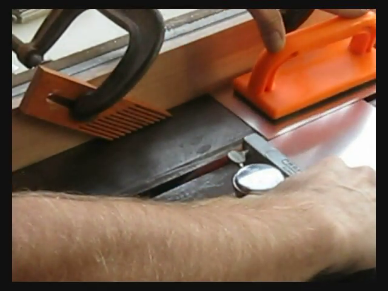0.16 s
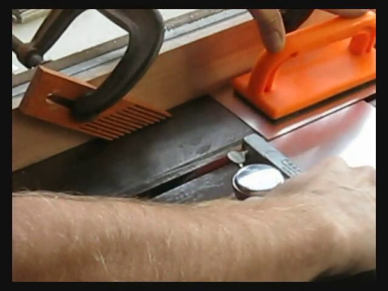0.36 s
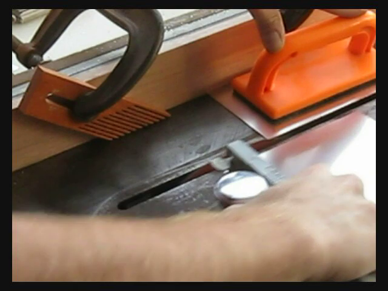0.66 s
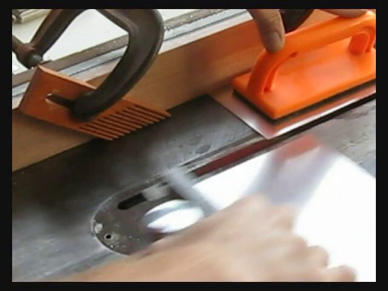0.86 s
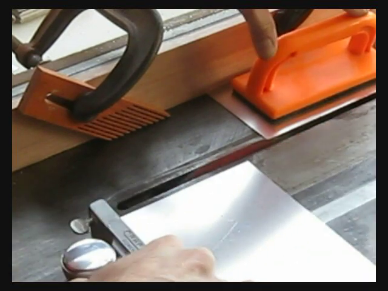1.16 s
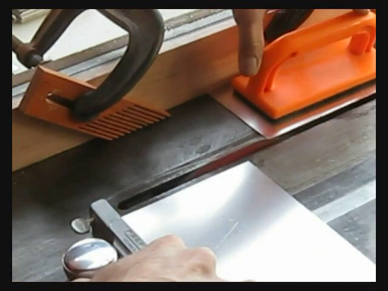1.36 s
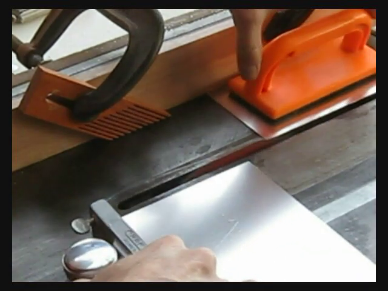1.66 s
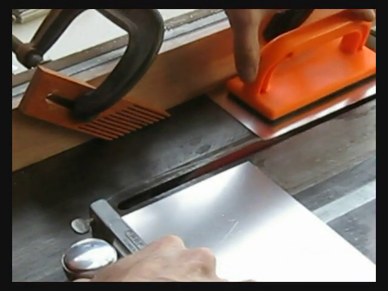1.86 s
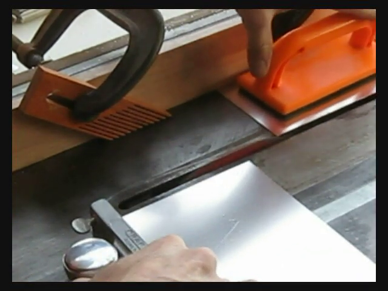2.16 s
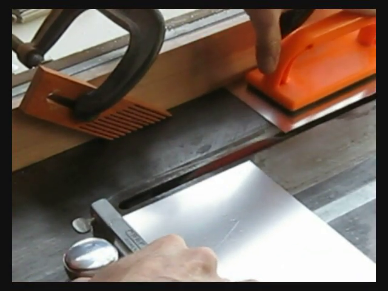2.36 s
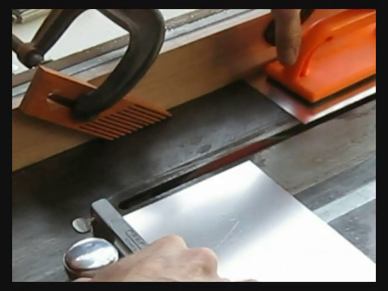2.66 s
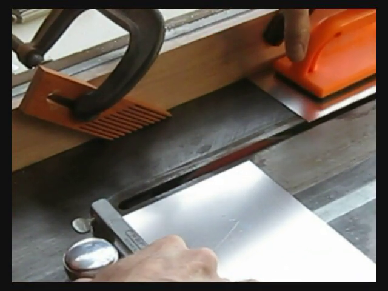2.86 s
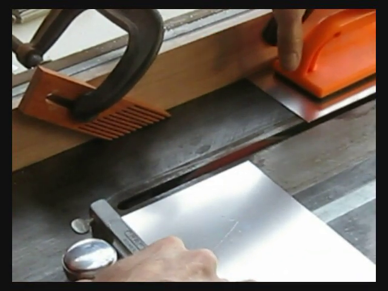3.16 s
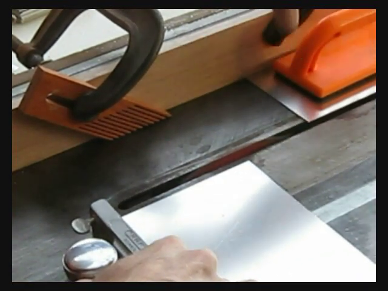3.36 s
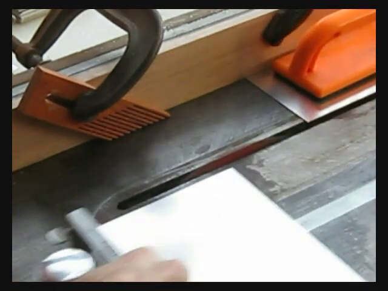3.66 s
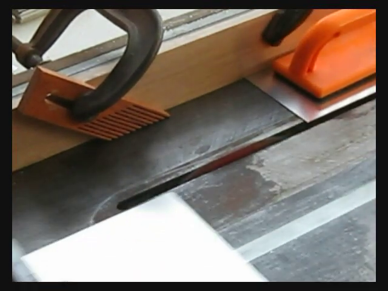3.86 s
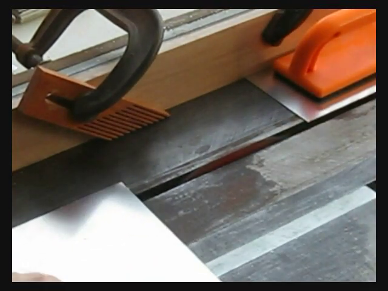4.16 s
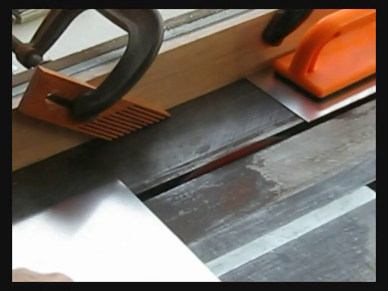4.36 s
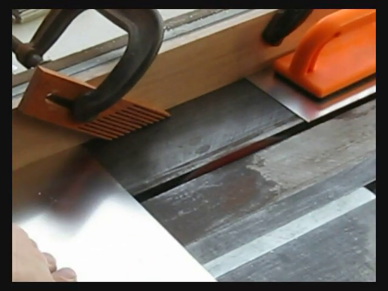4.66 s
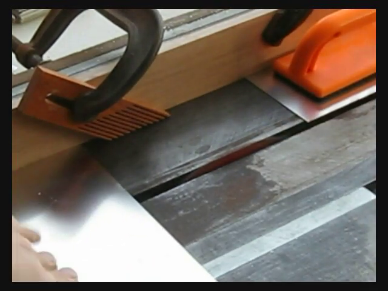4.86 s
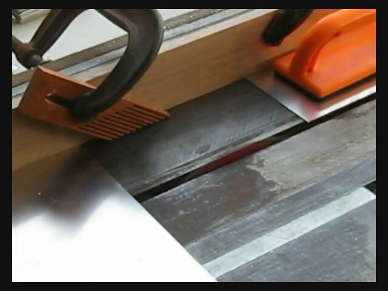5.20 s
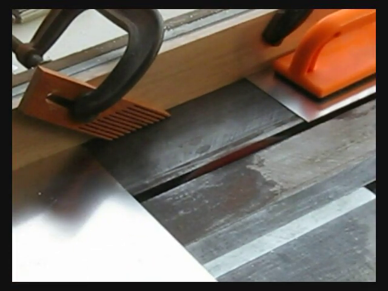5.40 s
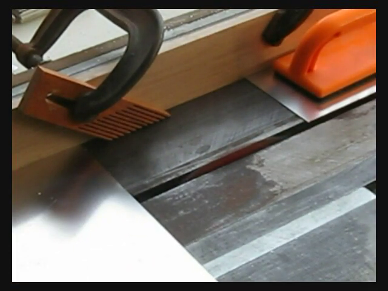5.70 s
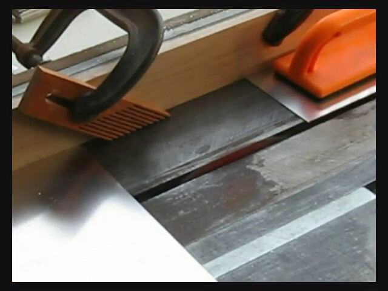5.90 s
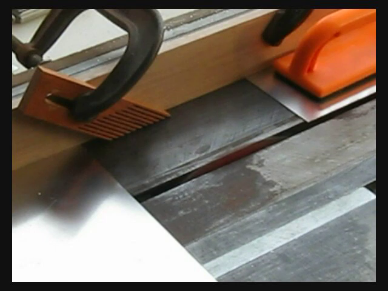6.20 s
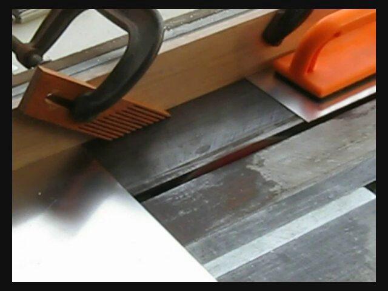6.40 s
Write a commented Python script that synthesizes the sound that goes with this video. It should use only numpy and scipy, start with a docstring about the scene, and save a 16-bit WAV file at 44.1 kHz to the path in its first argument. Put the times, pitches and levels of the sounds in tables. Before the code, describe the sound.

Steady, harsh saw noise heard very close through a small camera microphone with dull highs: coarse rasp, rattling cabinet, low hum and ringing blade. Metal sliding scrapes come early, then a short dip exposes a wavering squeal. The full noise returns, the sheet slides again and strikes the fence with one loud, dry clack, briefly pushing down the level before the saw continues.

```python
"""A table saw runs in a workshop while a thin aluminium sheet is moved along it, close to a small camera.
The motor hums (two sines), the drive rattles the cabinet and worn teeth rasp (coloured noise and
impacts); table and blade ring as noise-driven resonances. The sound dips while the sheet squeals
briefly on wavering sines; scrapes are dense impacts. Later the sheet knocks on the fence (decaying
modes and a short room tail) and the camera's gain control ducks and recovers."""
import sys
import numpy as np
from scipy import signal
from scipy.fft import rfft, irfft
from scipy.io import wavfile
from scipy.ndimage import uniform_filter1d

SR = 44100
rng = np.random.default_rng(int(sys.argv[2]) if len(sys.argv) > 2 else 0)


def unload_audio(sound):
    """Save the sound as a 16-bit wav file, at the path given as the first command line argument."""
    columns = np.transpose(np.atleast_2d(sound))
    # keep every value between -1 and 1, then stretch to whole-number steps
    steps = np.round(np.clip(columns, -1, 1) * 32767)
    wavfile.write(sys.argv[1], SR, steps.astype(np.int16))


N = 288395
T = np.arange(N) / SR  # s


def undb(db):
    """Amplitude factor of a level in dB."""
    return 10 ** (np.asarray(db) / 20)


def unit(x):
    """Scale to rms 1."""
    return x / np.sqrt(np.mean(x ** 2))


def colour(x, points):
    """Filter x by a gain curve of (f/Hz, level/dB) points, linear in log f; rms 1."""
    point_hz, point_db = np.transpose(points)
    f_hz = np.maximum(np.fft.rfftfreq(N, 1 / SR), 1)
    gain_db = np.interp(np.log(f_hz), np.log(point_hz), point_db)
    return unit(irfft(rfft(x) * undb(gain_db), N))


def resonate(x, modes):
    """Drive (f/Hz, width/Hz, level/dB) resonances with x; each is set to its own rms level."""
    f_hz, drive = np.fft.rfftfreq(N, 1 / SR), rfft(x)
    total = np.zeros(N)
    for mode_hz, width_hz, level_db in modes:
        response = f_hz / (f_hz * width_hz + 1j * (f_hz ** 2 - mode_hz ** 2))
        total += undb(level_db) * unit(irfft(drive * response, N))
    return total


def walk(rate_hz):
    """Smooth random curve with about rate_hz new values a second; rms 1."""
    step = max(int(SR / rate_hz), 1)
    held = np.repeat(rng.standard_normal(N // step + 1), step)
    return unit(uniform_filter1d(held, step)[:N])


def impacts(rate_hz, scatter_db):
    """Random tiny blows of uneven strength and either sign; rms 1."""
    hit = rng.random(N) < rate_hz / SR
    strength = undb(scatter_db * rng.standard_normal(N))
    return unit(hit * rng.choice([-1, 1], N) * strength)


def swell(start_s, length_s, edge_share=0.35):
    """One stroke, 0 to 1: smooth rise, hold, smooth fall; each edge takes edge_share of the length."""
    inside_s = np.minimum(T - start_s, start_s + length_s - T)
    return np.sin(np.pi / 2 * np.clip(inside_s / (edge_share * length_s), 0, 1))


def strokes(rows):
    """Gain over time of (start/s, length/s, level/dB) strokes."""
    return sum(undb(level_db) * swell(start_s, length_s) for start_s, length_s, level_db in rows)


def tones(modes):
    """Sustained (f/Hz, pitch waver/Hz rms, level/dB) sines, each wavering in pitch."""
    total = np.zeros(N)
    for mode_hz, waver_hz, level_db in modes:
        pitch_hz = mode_hz + waver_hz * walk(40.5)
        total += undb(level_db) * np.sin(2 * np.pi * np.cumsum(pitch_hz) / SR)
    return np.sqrt(2) * total


def motor(hum_hz=119.9, mains_db=-19, waver_db=1.5):
    """The iron hums at twice the mains rate, wavering in level, with a weak tone an octave below."""
    phase = 2 * np.pi * hum_hz * T
    hum = undb(waver_db * walk(9)) * np.sin(phase)
    return np.sqrt(2) * (hum + undb(mains_db) * np.sin(phase / 2))


def cabinet(body_db=-3.5, rattle_db=-2):
    """Belt and bearings rattle the cabinet over the churning air, and the table rings."""
    # colour of the rattling cabinet: f/Hz, level/dB
    cabinet_colour = [(25, -60), (60, -28), (105, -13), (205, -15), (240, -2), (310, -0.5), (355, -3),
                      (450, 1), (510, -4.5), (760, -7), (930, -7.5), (1050, -15.5), (1200, -33),
                      (2500, -36)]
    # resonances of cabinet and table: f/Hz, width/Hz, level/dB
    table_modes = [(316, 6, -17.5), (441, 6, -22), (458, 6, -17), (661, 6, -20), (726, 4, -20),
                   (783, 12, -21), (841, 5, -21), (904, 7, -24), (952, 6, -21), (1036, 6, -27),
                   (1095, 16, -30), (1253, 3, -31), (1300, 25, -31)]
    drive = rng.standard_normal(N) + undb(rattle_db) * impacts(rate_hz=700, scatter_db=2.5)
    body = undb(body_db) * colour(drive, cabinet_colour)
    return body + resonate(rng.standard_normal(N), table_modes)


def blade(ring_db, rasp_db=-0.41, grit_db=-2, flutter_hz=218, flutter=0.061, flicker_db=0.41,
          ring_waver_db=1.5):
    """Worn teeth scrape and tear the air with a slight flutter; the plate rings along."""
    # colour of the rasp at the teeth: f/Hz, level/dB
    rasp_colour = [(300, -13.5), (1150, -8), (1320, -9), (1430, -6.5), (1850, -3), (2100, 0.5), (2400, 1.5),
                   (2900, 1), (3600, 0.5), (4900, -1.5), (5400, -7.5), (7000, -7.5)]
    # ringing of the blade plate: f/Hz, width/Hz, level/dB
    blade_modes = [(2060, 4, -20), (2075, 5, -25), (2224, 16, -21), (2360, 60, -21), (2509, 14, -19),
                   (2668, 20, -21), (2860, 26, -24), (3111, 3, -23), (4772, 4, -26)]
    teeth = rng.standard_normal(N) + undb(grit_db) * impacts(rate_hz=4000, scatter_db=-1.0)
    teeth *= 1 + flutter * np.sin(2 * np.pi * flutter_hz * T)
    teeth *= undb(flicker_db * walk(40))
    plate = resonate(rng.standard_normal(N), blade_modes) * undb(ring_waver_db * walk(8.1))
    return undb(rasp_db) * colour(teeth, rasp_colour) + undb(ring_db) * plate


def saw():
    """One level curve moves rasp, ring, rumble and hum; the plate's ring falls further in the dip."""
    # level of the saw sound over time, steady after the last point: t/s, level/dB
    level_points = [(0, -25.5), (0.4, -23.5), (0.75, -23), (1.0, -24.5), (1.22, -22), (1.5, -23.5),
                    (1.75, -26), (1.85, -33), (2.05, -32.5), (2.26, -33), (2.5, -26.5), (2.73, -22.5),
                    (3.2, -23.5), (4.5, -22.5), (5.3, -23.5), (6.1, -22.5), (6.54, -23.5)]
    # the teeth bite harder for a moment: start/s, length/s, gain of rasp and ring/dB
    bites = [(0.664, 0.23, 1), (1.728, 0.32, 5), (2.035, 0.075, 5), (2.6, 0.22, 1.2)]
    # the hum sags briefly: start/s, length/s, depth/dB
    hum_sags = [(0.0, 0.4, 3.5), (1.76, 0.23, 6), (4.25, 0.45, 4)]
    reference_db = -20.5
    rasp_db, rumble_db, hum_db = -0.64, 0.5, -12  # against the level curve
    ring_db = 4  # ring gain at the reference level
    hum_follow, ring_follow = 1.0, 0.84  # dB of hum, and of ring against rasp, per dB of level
    rise_db_per_s = 0.18  # rasp and ring slowly gain on the rumble

    saw_db = np.interp(T, *np.transpose(level_points))
    extra_db = saw_db - reference_db
    bite_db = sum(gain_db * swell(start_s, length_s) for start_s, length_s, gain_db in bites)
    sag_db = sum(depth_db * swell(start_s, length_s) for start_s, length_s, depth_db in hum_sags)
    rise_db = rise_db_per_s * (T - T.mean())

    rasp_gain = undb(saw_db + rasp_db + bite_db + rise_db)
    rasp = rasp_gain * blade(ring_db + ring_follow * extra_db)
    rumble = undb(saw_db + rumble_db) * cabinet()
    hum = undb(reference_db + hum_db + hum_follow * extra_db - sag_db) * motor()
    return rasp + rumble + hum


def slide():
    """Chips and burrs catch between sheet and table in a dense scrape."""
    # strokes of the sheet over the iron table: start/s, length/s, level/dB
    slides = [(0.0, 0.79, -27.5), (0.62, 0.46, -28), (1.14, 0.11, -29.5), (1.3, 0.51, -30), (3.6, 0.3, -28),
              (4.3, 0.28, -30), (4.6, 0.37, -33)]
    # colour of the sliding sheet: f/Hz, level/dB
    sheet_colour = [(150, -29), (250, -9.5), (420, -5), (530, 10.5), (730, 0.5), (880, -12), (1200, -4),
                    (1700, -14), (2500, -35), (3400, -23), (4200, -10), (5200, -9)]
    return strokes(slides) * colour(impacts(rate_hz=2000, scatter_db=3.5), sheet_colour)


def blade_song(start_s=0.635, length_s=0.15, level_db=-37):
    """One mode of the blade plate sings out during the first bite."""
    # singing blade mode: f/Hz, pitch waver/Hz, level/dB
    sing_mode = [(2509, 5, 0)]
    return undb(level_db) * swell(start_s, length_s) * tones(sing_mode)


def squeal():
    """Friction keeps the rubbed sheet singing on a few modes, then once more faintly."""
    # squeals: start/s, length/s, level/dB
    squeals = [(1.84, 0.28, -30.5), (2.14, 0.12, -41)]
    # modes that sing: f/Hz, pitch waver/Hz, level/dB
    squeal_modes = [(830, 2.1, -3), (716, 11, -13), (1935, 5.9, -15)]
    return strokes(squeals) * tones(squeal_modes)


def knocks(room_db=-24, room_t60_s=0.18):
    """A light touch, then a hard blow; the hand damps the ring and the workshop answers briefly."""
    # sheet knocks on the fence: t/s, level/dB
    knock_times = [(4.6135, -17), (4.6218, 4.5)]
    # ringing of sheet and fence: f/Hz, level/dB, t60/s
    knock_modes = [(406, -7, 0.14), (504, -13, 0.069), (565, -11, 0.2), (748, 8, 0.014), (963, -6, 0.05),
                   (1200, -9, 0.053), (1390, -17, 0.0036), (2850, -17, 0.026)]
    # colour of the workshop's answer: f/Hz, level/dB
    workshop_colour = [(120, -20), (330, 0), (700, -7), (1000, 7), (1300, -4), (1900, -10), (5000, -32)]
    ring = np.zeros(N)
    for mode_hz, level_db, t60_s in knock_modes:
        ring += undb(level_db - 60 * T / t60_s) * np.sin(2 * np.pi * mode_hz * T)
    ring /= np.abs(ring).max()
    room_decay = np.exp(-np.log(1000) * T / room_t60_s)
    room = undb(room_db) * room_decay * colour(rng.standard_normal(N), workshop_colour)
    blows = np.zeros(N)
    for t_s, level_db in knock_times:
        blows[int(t_s * SR)] += undb(level_db)
    return signal.fftconvolve(blows, ring + room)[:N]


def scene():
    """Saw and sheet, all close by, in one channel."""
    return (saw() + slide() + blade_song() + squeal() + knocks())[None]


def gain_control(x, threshold_db=-13, release_db_per_s=25):
    """The gain drops at once on a peak and creeps back at a steady rate."""
    power = np.maximum(uniform_filter1d(x ** 2, size=44), 1e-12)  # 1 ms mean
    over_db = np.maximum(10 * np.log10(power) - threshold_db, 0)
    creep_db = release_db_per_s * T
    # highest excess so far, less the creep since
    return x * undb(creep_db - np.maximum.accumulate(over_db + creep_db, axis=-1))


def record(dry, hiss_db=-38, band_hz=5230, top_hz=15700):
    """Gain control and a narrow sound band; a faint hiss up to top_hz rides on the level."""
    lowpass = signal.firwin(241, band_hz, fs=SR)[None]
    narrow = signal.fftconvolve(gain_control(dry), lowpass, mode="same")
    loudness = np.sqrt(np.abs(uniform_filter1d(narrow ** 2, size=90)))  # 2 ms rms
    hiss = undb(hiss_db) * loudness * rng.standard_normal(N)
    top_cut = signal.ellip(10, .1, 80, top_hz, fs=SR, output="sos")
    return signal.sosfilt(top_cut, narrow + hiss)


dry = scene()
out = record(dry)
unload_audio(out)
```